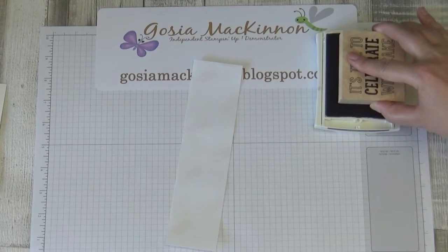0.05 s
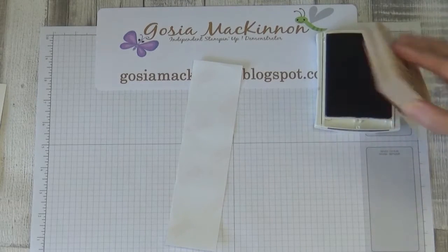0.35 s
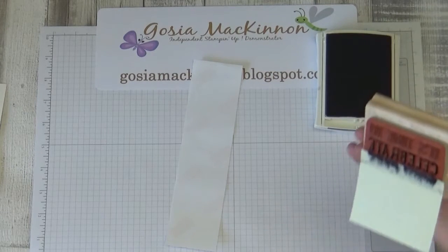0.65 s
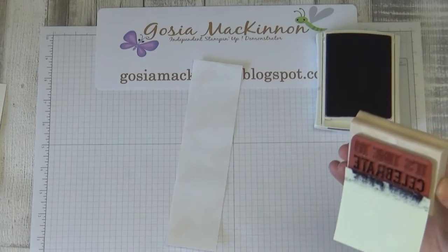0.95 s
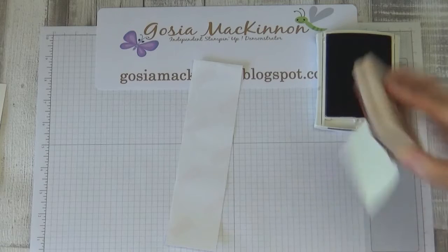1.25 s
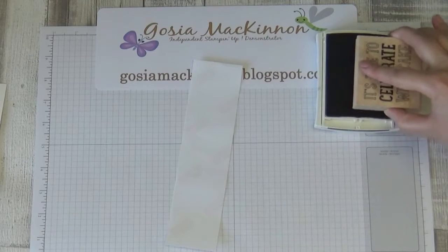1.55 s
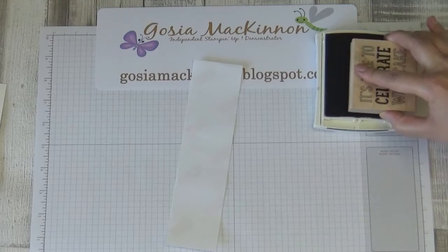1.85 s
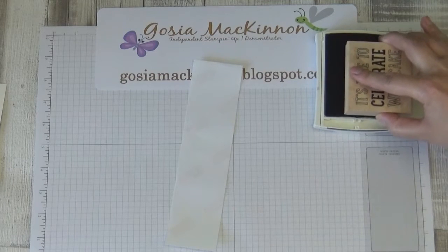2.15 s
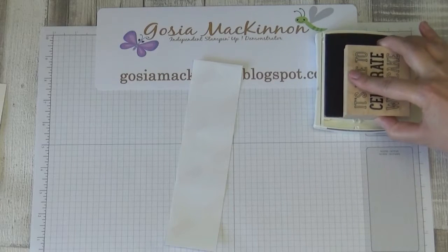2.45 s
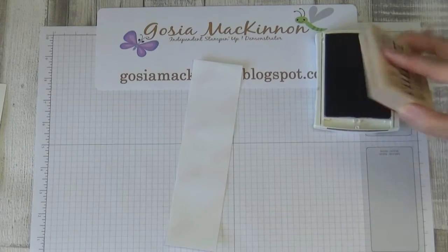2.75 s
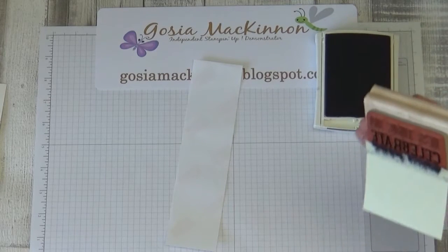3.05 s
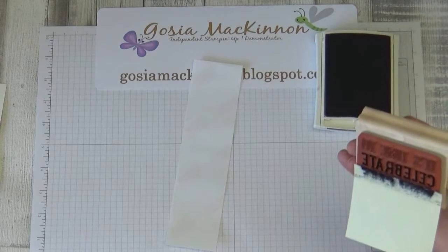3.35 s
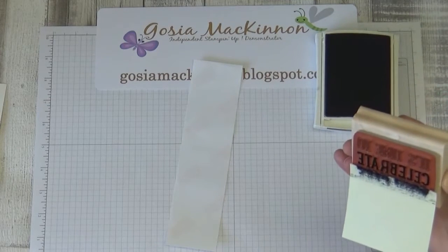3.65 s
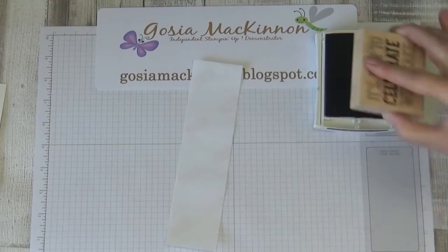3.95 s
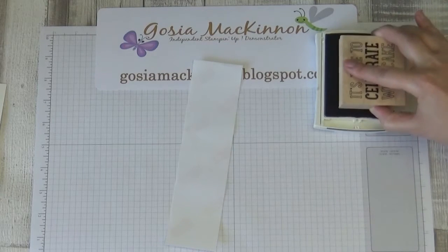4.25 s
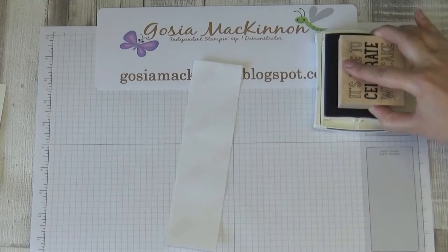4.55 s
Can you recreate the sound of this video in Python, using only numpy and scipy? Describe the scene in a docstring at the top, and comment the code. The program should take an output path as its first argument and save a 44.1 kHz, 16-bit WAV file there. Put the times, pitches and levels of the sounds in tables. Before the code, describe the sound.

A wooden rubber stamp knocks five times on a plastic-cased ink pad, with faint sticky peels and finger ticks over quiet room hiss.

```python
"""A quiet hiss and a soft bump are heard first; then a wood-mounted rubber stamp is knocked five times
onto an ink pad in a plastic case, on a table in a small room. Each knock is a double impact: the rubber
touches, then the block lands. The impacts excite damped normal modes, so the block clacks, the case
rattles and the table top booms, and the room reverberates. Around the knocks, tacky rubber peels off
the pad as its adhesive contacts break, and fingers tick on the wood."""
import sys
import numpy as np
from scipy import signal
from scipy.fft import rfft, irfft
from scipy.io import wavfile

SR = 44100
rng = np.random.default_rng(int(sys.argv[2]) if len(sys.argv) > 2 else 0)


def file_out(sig):
    """Save sig as 16-bit WAV at sys.argv[1]."""
    # one column per channel
    cols = np.atleast_2d(sig).T
    # limit, then scale
    lim = np.clip(cols, -1, 1)
    pcm = np.round(lim * 32767).astype(np.int16)
    wavfile.write(sys.argv[1], SR, pcm)


N = 203124
RING = np.arange(SR // 2) / SR  # time since a contact, t/s

# Levels are relative; a spectrum lists density levels, and a coherence is that of left with right.
# background spectrum: f/Hz, level/dB
HISS_SPECTRUM = [(20, -11.5), (107, -1.5), (172, -5), (240, -3), (410, -2.5), (600, -3), (1060, -5.5),
                 (1500, -5.5), (2140, -10), (3740, -14), (10200, -20), (16000, -25)]
# background coherence: f/Hz, coherence
HISS_COHERENCE = [(60, 1), (180, 0.86), (550, 0.37), (1650, 0.18), (4970, 0.62), (15000, 1)]
# spectrum of the room's response to a knock: f/Hz, level/dB
ECHO_SPECTRUM = [(30, -12), (100, -3), (300, -13), (600, 1.5), (1300, -5), (1900, -11.5), (2700, -9),
                 (4000, -13.5), (5000, -20.5), (5700, -20.5), (6500, -26), (11000, -26), (16000, -37)]
# coherence of the reflections: f/Hz, coherence
ECHO_COHERENCE = [(100, 0.96), (1000, 0.28), (4000, 0.82), (10000, 0.97)]
# reverberation time of the room: f/Hz, T60/s
ROOM_T60 = [(60, 0.29), (200, 0.71), (500, 0.37), (1200, 0.3), (3000, 0.21), (10000, 0.24)]
# rubber peeling and skin sliding: centre t/s, level/dB, half-width/s
PEEL_EVENTS = [(0.202, -50.5, 0.012), (2.428, -56.5, 0.017), (2.611, -54.5, 0.015), (3.883, -63.5, 0.026),
               (4.456, -54.5, 0.011)]
# spectrum of peeling: f/Hz, level/dB
PEEL_SPECTRUM = [(300, 5.5), (1100, 8), (2500, 4.5), (4000, 8.5), (7000, 0), (11000, 4.5), (16000, -19)]
# fingers ticking on the block: t/s, level/dB
TICK_EVENTS = [(1.433, -43.5), (1.522, -51.5), (3.79, -53), (3.902, -49.5), (3.935, -55), (4.013, -38),
               (4.021, -41), (4.09, -48.5)]
# spectrum of a tick: f/Hz, level/dB
TICK_SPECTRUM = [(300, -17), (2000, -19.5), (4500, -9), (7000, -5), (10500, -0.5), (16000, -9)]
# the pad settling as the hand's weight shifts: t/s, level/dB
BUMP_EVENTS = [(.002, -41.5), (2.412, -36)]
# modal weighting of a soft push: f/Hz, level/dB
BUMP_COLOUR = [(100, 10.5), (350, 2.5), (1200, -2)]
# modes of the table top under the pad: f/Hz, level/dB, T60/s, gain per unit of place/dB
TABLE_MODES = [(68.7, -34, 0.41, 2), (124.8, -23, 0.3, 3.5), (154.7, -24, 0.29, 2.2), (200.5, -19, 0.16, 2),
               (223.5, -26, 0.3, 0.5), (262.2, -20.5, 0.22, 1.3), (289.5, -26, 0.27, 1),
               (330.7, -13.5, 0.14, -0.7), (351.7, -25.5, 0.3, 1), (374, -22, 0.21, 0),
               (434.4, -23, 0.17, 3.5), (466.8, -22, 0.15, -4.5), (511.4, -24.5, 0.17, 2.5),
               (572.6, -21.5, 0.12, 2.5), (609, -33, 0.14, 1.5), (657.5, -27.5, 0.18, 3),
               (696, -22.5, 0.12, -3.5), (800, -22.5, 0.12, 0), (845, -27.5, 0.11, 2.5),
               (891, -25.5, 0.11, -2), (945.6, -22.5, 0.097, -2.8), (1021, -24.5, 0.12, 0.5),
               (1082, -39, 0.27, 3), (1131, -20.5, 0.092, -3.5), (1192, -29, 0.18, 4),
               (1249, -42.5, 0.26, 8.5), (1307, -33.5, 0.16, 4.5), (1300, -33, 0.055, -4)]
# modes of the plastic case: f/Hz, level/dB, T60/s, gain per unit of place/dB
CASE_MODES = [(1565, -43.5, 0.11, -6), (1783, -39.5, 0.12, 2), (2354, -41, 0.15, 2), (2530, -33, 0.13, 0.5),
              (2615, -29.5, 0.082, -1), (2710, -42, 0.13, 2), (3473, -34, 0.037, -1),
              (3670, -37, 0.081, 2.5), (5700, -44.5, 0.07, 0)]
# modes of the hand-damped block on the pad: f/Hz, level/dB, T60/s
BLOCK_MODES = [(189.7, -10.5, 0.078), (281.2, -11, 0.057), (476, -8, 0.047), (653, -10, 0.046),
               (1021, -5, 0.02)]
# spectrum of rubber meeting the pad: f/Hz, level/dB
PAT_SPECTRUM = [(300, 1), (1200, -3), (2700, -10), (6000, -19), (16000, -30)]
# spectrum of the hard landing: f/Hz, level/dB
CRACK_SPECTRUM = [(300, 2.5), (800, -27), (1400, 4), (2000, -2), (2700, -4), (3800, -3), (4900, -13.5),
                  (5700, -8), (6500, -22), (8000, -14.5), (12000, -16), (16000, -35)]
# knocks: t/s, strength/dB, place (0 = mid-pad), rocking time/s, second edge/dB, hollow/dB, rattle/dB
KNOCK_EVENTS = [(1.6109, -6, -1.27, 0.03, -9, -2.5, 2), (1.9517, -1.5, -0.92, 0.012, -7.5, -4, 1.5),
                (2.2101, -.5, -0.92, 0.015, -8, -2.5, -1.5), (4.266, 1.27, 1.7, .014, -7, -5, 2),
                (4.535, 0, 0.2, 0.018, -20, 2, 1)]


def amp(db):
    """Amplitude ratio of a level in decibels."""
    return 10 ** (np.asarray(db) / 20)


def unit(x):
    """Normalisation to an rms of 1."""
    return x / np.sqrt(np.mean(x ** 2) + 1e-20)


def along(points, hz):
    """Interpolation of (f/Hz, value) points on a logarithmic frequency axis."""
    f, v = np.transpose(points)
    return np.interp(np.log(hz + 1), np.log(f + 1), v)


def fade(t, t60):
    """Exponential decay of 60 dB in t60 seconds."""
    return amp(-60 * t / t60)


def rise(seconds):
    """First-order build-up with the given time constant."""
    return 1 - np.exp(-RING / seconds)


def filtered(x, gain):
    """Zero-phase filtering: the spectrum is multiplied by gain(f)."""
    size = x.shape[-1]
    return irfft(rfft(x) * gain(np.fft.rfftfreq(size, 1 / SR)), size)


def noise(spectrum, coherence, size=len(RING)):
    """Coloured stereo noise of rms 1; the ratio of mid to side power sets its coherence."""
    def mid_side_gain(hz):
        angle = np.arccos(np.clip(along(coherence, hz), -1, 1)) / 2
        return amp(along(spectrum, hz)) * [np.cos(angle), np.sin(angle)]
    mid, side = filtered(rng.standard_normal((2, size)), mid_side_gain)
    return unit(np.array([mid + side, mid - side]))


def grainy(depth_db, rate_hz, size=len(RING)):
    """Random amplitude modulation of rms 1, as from many tiny contacts."""
    samples = np.arange(size)
    return unit(amp(depth_db * np.interp(samples * rate_hz / SR, samples, rng.standard_normal(size))))


def ring(hz, gain, t60):
    """Free vibration as a sum of damped modes; a complex gain shifts the phase."""
    return np.imag(gain @ (np.exp(2j * np.pi * hz[:, None] * RING) * fade(RING, t60[:, None])))


def add(track, s, sound):
    """Linear superposition of a sound on the track from s seconds on."""
    part = track[:, max(round(s * SR), 0):][:, :sound.shape[-1]]
    part += sound[..., :part.shape[-1]]


def hiss(level_db=-57):
    """Stationary, partly coherent noise forms the background."""
    return amp(level_db) * noise(HISS_SPECTRUM, HISS_COHERENCE, N)


def room_tail(spectrum):
    """Reverberation: diffuse reflections decay at a rate that depends on frequency."""
    hz, t, bands = signal.stft(noise(spectrum, ECHO_COHERENCE), SR, nperseg=256)
    bands = bands * fade(t, along(ROOM_T60, hz)[:, None])
    return signal.istft(bands, SR, nperseg=256)[1][:, :len(RING)]


def peels():
    """Adhesion fails at many tiny contacts, giving short swells of grainy noise."""
    t = np.arange(N) / SR
    swell = sum(amp(db) / np.cosh(np.clip((t - s) / width, -20, 20)) for s, db, width in PEEL_EVENTS)
    return swell * grainy(depth_db=3, rate_hz=600, size=N) * noise(PEEL_SPECTRUM, [(1000, 0.92)], N)


def finger_ticks(echo_db=-15):
    """Brief contacts have broad spectra: the changing grip ticks brightly, with faint reverberation."""
    out = np.zeros((2, N))
    for s, db in TICK_EVENTS:
        tick = noise(TICK_SPECTRUM, [(1000, 0.93)]) * fade(RING, t60=0.027)
        echo = amp(echo_db) * room_tail(TICK_SPECTRUM)
        add(out, s, amp(db) * (tick + echo) * rise(0.00048))
    return out


def table_top(place, colour, t60_factor=1, spread_db=1, spread_rad=0.2):
    """Modal interference: neighbouring modes start in opposite phase, so the boom swells."""
    hz, db, t60, place_db = np.transpose(TABLE_MODES)
    polarity = -np.cos(np.pi * np.arange(len(hz)))
    # each mode reaches left and right with a slightly different level and phase
    level_skew, phase_skew = rng.standard_normal((len(hz), 2)).T
    left_right = np.array([[1], [-1]])
    gain = polarity * amp(db + place * place_db + along(colour, hz) + spread_db * level_skew * left_right)
    phase = np.exp(1j * spread_rad * phase_skew * left_right)
    return ring(hz, gain * phase, t60_factor * t60) * rise(0.0049)


def bumps():
    """A slowly applied force favours the table's low modes."""
    out = np.zeros((2, N))
    for s, db in BUMP_EVENTS:
        add(out, s, amp(db) * table_top(0, BUMP_COLOUR))
    return out


def rubber_pat(level_db=-29):
    """A compliant contact gives little treble: inked rubber pats the pad."""
    return amp(level_db) * noise(PAT_SPECTRUM, [(1000, 0.93)]) * fade(RING, t60=0.015) * rise(0.0007)


def plastic_case(place):
    """Modal excitation depends on the point of impact, here with random signs and level scatter."""
    hz, db, t60, place_db = np.transpose(CASE_MODES)
    polarity = rng.choice([-1, 1], len(hz))
    gain = amp(db + place * place_db + rng.normal(0, 2, len(hz)))
    return ring(hz, polarity * gain, t60) * rise(0.00095)


def wood_block(colour):
    """Heavily damped modes give the wood's thud and clack; the rubber cushions their onset."""
    hz, db, t60 = np.transpose(BLOCK_MODES)
    return ring(hz, -amp(db + along(colour, hz)), t60) * rise(0.0029) ** 2


def landing(place, colour, rock_s, edge_db, crack_db=-21, echo_db=-28.5):
    """Impulsive excitation: the block bottoms out, rocks onto its other edge, and case and room ring."""
    case = plastic_case(place)
    contacts = amp(crack_db) * noise(CRACK_SPECTRUM, [(1000, 0.98)])
    contacts *= fade(RING, t60=0.029) * rise(0.00029)
    edge = amp(crack_db + edge_db) * noise(CRACK_SPECTRUM, ECHO_COHERENCE)
    edge *= fade(RING, t60=0.041) * rise(0.001)
    softened_edge = filtered(edge, lambda hz: amp(along([(3500, -4.5), (9000, -1)], hz)))
    add(contacts, rock_s, softened_edge)
    contacts *= grainy(depth_db=3, rate_hz=1170)  # the landing breaks up into many tiny contacts
    echo = amp(echo_db) * room_tail(ECHO_SPECTRUM) * rise(0.0029)
    padded = np.pad(case + contacts + echo, ((0, 0), (0, len(RING))))
    return filtered(padded, lambda hz: amp(along(colour, hz)))[:, :len(RING)]


def knock_colour(strength_db, place, hollow_db, rattle_db):
    """Nonlinear contact: a harder knock drives more wood through the rubber. Gives f/Hz, level/dB."""
    body_db = 1.07 * strength_db
    return [(130, -0.5 + body_db - 3.5 * place),  # thud
            (290, 0),  # boom
            (606, hollow_db + body_db),  # hollow note
            (1100, 1.5 + body_db - 3.7 * place),  # clack
            (1650, -0.3 * place),  # case note
            (3300, rattle_db),  # rattle
            (9000, 0)]  # snap


def knocks(squash_s=0.002, damping_per_db=0.0084):
    """Two-stage impact: the rubber touches and compresses, then the block lands."""
    out = np.zeros((2, N))
    for s, db, place, rock_s, edge_db, hollow_db, rattle_db in KNOCK_EVENTS:
        colour = knock_colour(db, place, hollow_db, rattle_db)
        t60_factor = 0.96 * (1 - damping_per_db * db)  # a lighter hand damps the table less
        add(out, s, amp(db) * (rubber_pat() + table_top(place, colour, t60_factor) + wood_block(colour)))
        add(out, s + squash_s, amp(db) * landing(place, colour, rock_s, edge_db))
    return out


def scene(pan_db=0.39):
    """Superposition of the stamp's sounds, slightly louder on the left, and the steady hiss."""
    stamp = knocks() + bumps() + finger_ticks() + peels()
    return stamp * amp([[pan_db], [-pan_db]]) + hiss()


def record(dry, cutoff_hz=15900):
    """Band limiting: an ideal low-pass filter removes the highest treble."""
    padded = np.pad(dry, ((0, 0), (0, len(RING))))
    return filtered(padded, lambda hz: hz < cutoff_hz)[:, :N]


dry = scene()
out = record(dry)
file_out(out)
```